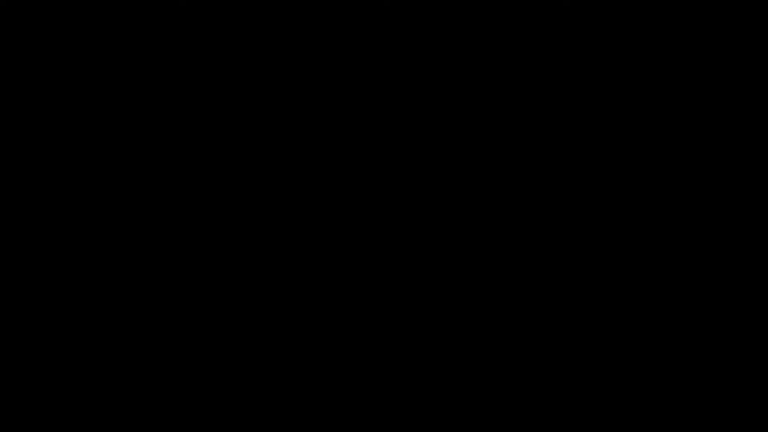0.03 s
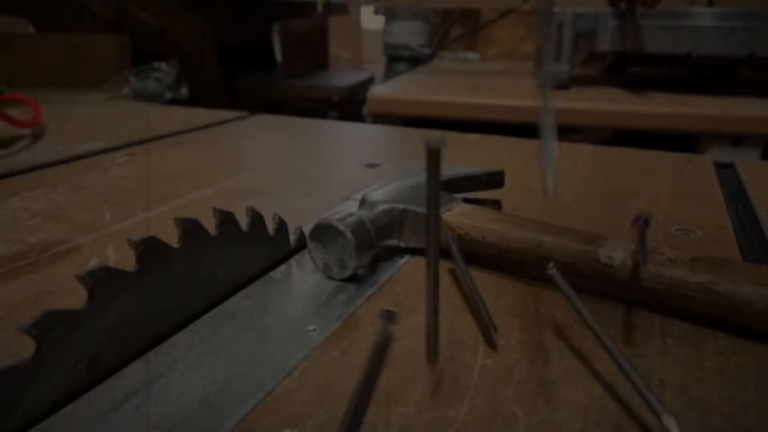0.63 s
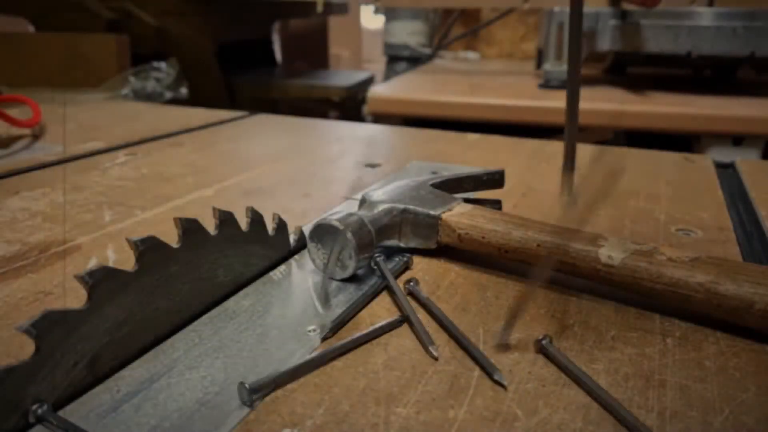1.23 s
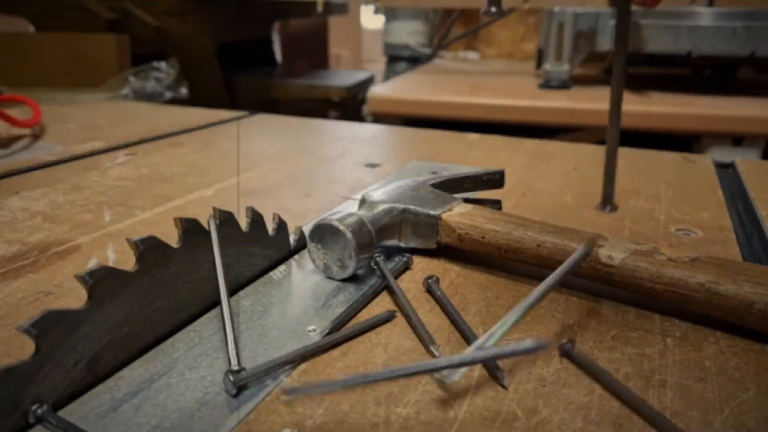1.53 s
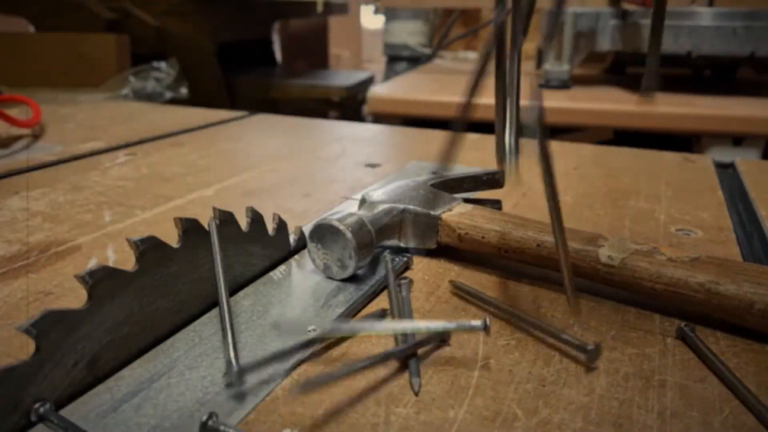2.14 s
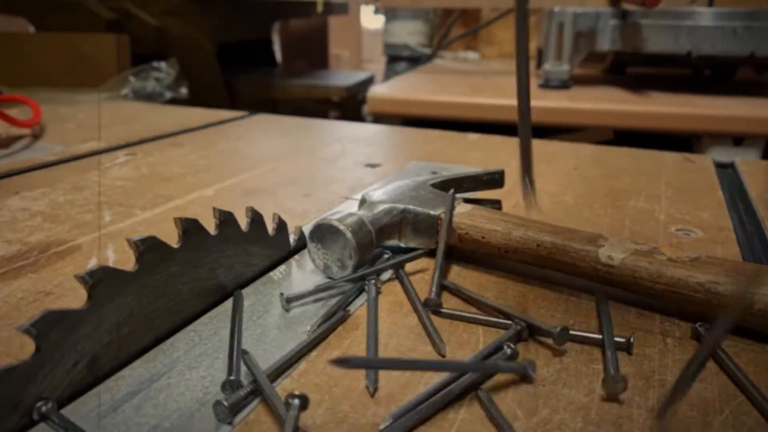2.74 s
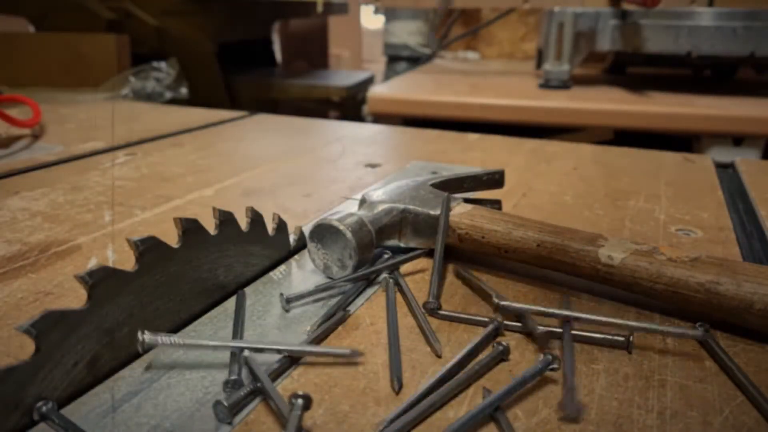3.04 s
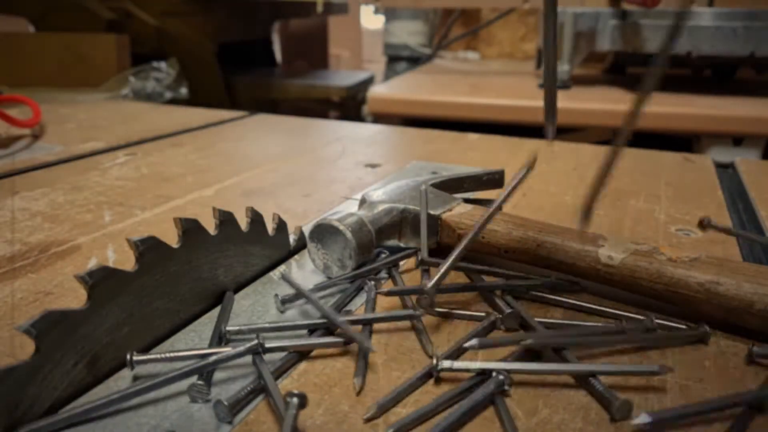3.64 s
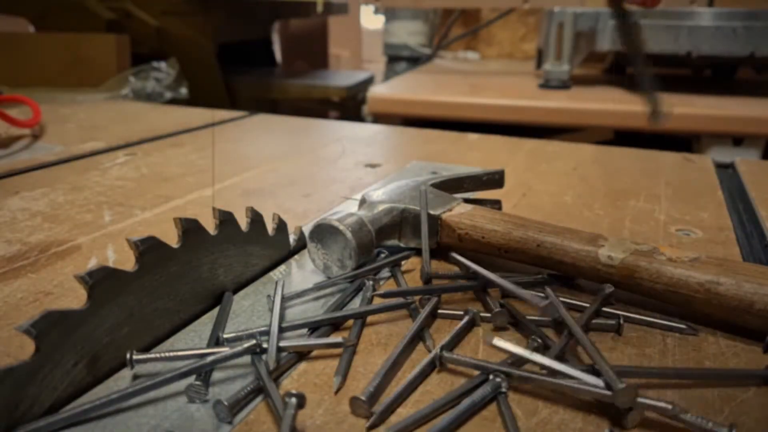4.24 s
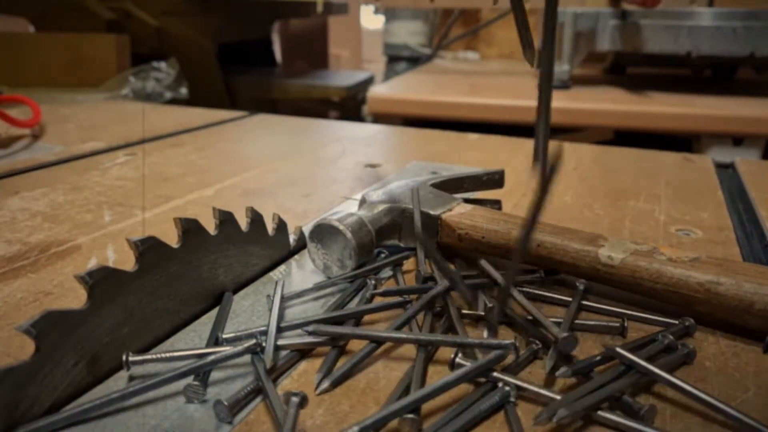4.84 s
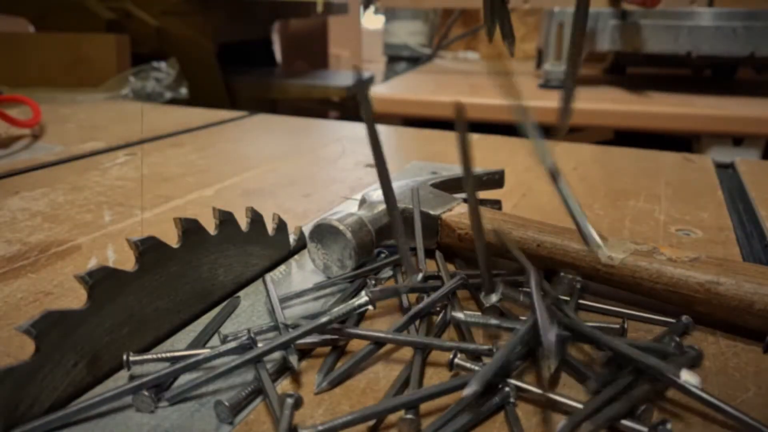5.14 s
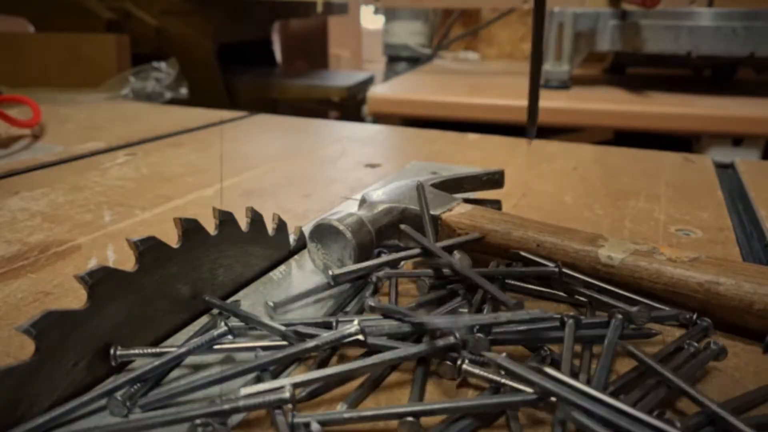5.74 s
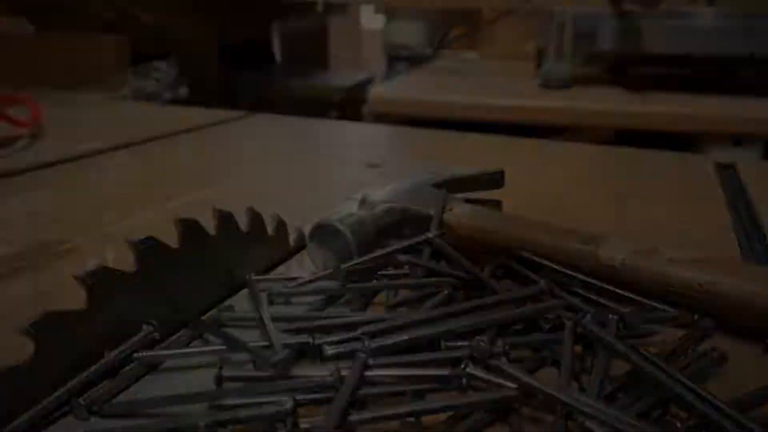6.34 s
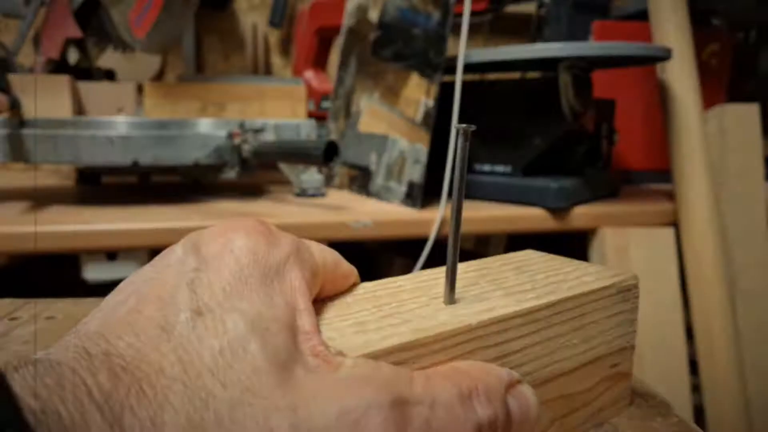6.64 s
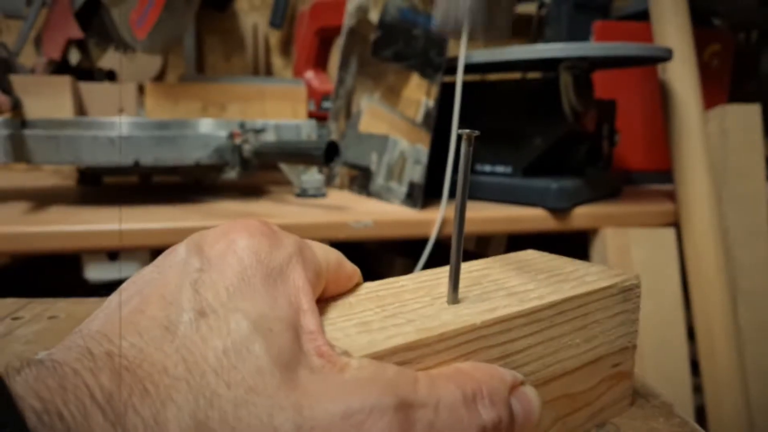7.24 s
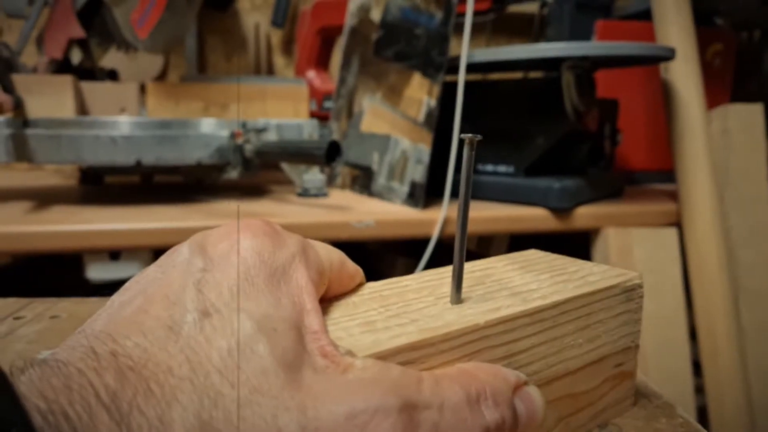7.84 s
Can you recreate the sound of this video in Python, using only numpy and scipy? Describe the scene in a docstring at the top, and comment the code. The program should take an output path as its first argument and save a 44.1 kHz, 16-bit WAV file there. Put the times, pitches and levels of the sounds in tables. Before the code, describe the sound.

Handfuls of steel nails drop onto a wooden workbench, knocking on the wood, ticking against each other and ringing with a high, thin tone as they bounce and skitter. A few ping off a saw blade. After about six seconds the clatter fades out, and a hammer drives a nail into a wooden block with six quick, even blows, each a crack and a thud. The stereo microphones are close, in a small workshop.

```python
"""Handfuls of steel nails rain on a wooden workbench, a saw blade and each other. Each impact gives a
knock and a tick and excites the nail's bending modes, the strongest near 9.6 kHz; the nails then hop
and skitter. The clatter fades out, and a hammer drives a nail into a wooden block with six even blows,
each a crack and a thud that set the block's modes ringing. A close pair of microphones stands on the
bench, picking up bumps through its stand and the reverberation of a small workshop."""
import sys
import numpy as np
from scipy import signal
from scipy.fft import rfft, irfft
from scipy.io import wavfile

SR = 44100
rng = np.random.default_rng(int(sys.argv[2]) if len(sys.argv) > 2 else 0)


def unload_wav(signal):
    """Save mono or channel-first audio to the path in sys.argv[1] as 16-bit WAV at rate SR, clipped to [-1, 1]."""
    wavfile.write(
        sys.argv[1],
        SR,
        np.round(np.clip(np.atleast_2d(signal).T, -1, 1) * 32767).astype(np.int16),
    )


N = 347508
TIME = np.arange(N) / SR

# Levels within a table are relative; the function that plays it may add an overall gain.
# hardest landings of the nails: start_s, knock_db, tick_db, pitch_hz, ring_db
LANDINGS = [(0.1837, -28, -31.5, 9320, -40), (0.1932, -35, -29.5, 9500, -43.5),
            (0.3229, -21, -29, 9630, -27.5), (0.3681, -20, -31, 9400, -35.5), (0.3792, -33, -25, 9870, -30),
            (0.3889, -36, -25.5, 9860, -38), (0.4335, -25, -19.5, 9730, -28),
            (0.4383, -18, -16.5, 9760, -25.5), (0.475, -20, -30.5, 9650, -21),
            (0.501, -20, -37.5, 9440, -28), (0.5462, -34.5, -30, 9730, -32),
            (0.5988, -19, -20.5, 9760, -26.5), (0.6199, -35.5, -21.5, 9430, -23.5),
            (0.6389, -21, -33, 9500, -17), (0.6981, -23.5, -26, 9490, -28), (0.7189, -23, -19, 9560, -25.5),
            (0.7299, -24.5, -21.5, 9490, -27), (0.7686, -24.5, -16, 9630, -17),
            (0.8808, -30.5, -18.5, 9900, -34), (0.9038, -46, -22.5, 9400, -32.5),
            (0.937, -32.5, -23.5, 9790, -29), (1.095, -36, -26, 9550, -40.5),
            (1.2004, -19.5, -32, 9480, -20.5), (1.2646, -19, -22, 9700, -45.5),
            (1.2767, -38, -22.5, 9540, -33), (1.2932, -20.5, -23, 9670, -28),
            (1.3127, -47, -33, 9660, -25.5), (1.3601, -44, -18.5, 9500, -30),
            (1.4073, -23.5, -21.5, 9800, -38), (1.4448, -17, -25, 9670, -47.5),
            (1.4926, -28, -21, 9830, -42.5), (1.5089, -25, -32, 9680, -44.5),
            (1.5466, -22, -21.5, 9650, -39.5), (1.6264, -26.5, -26, 10000, -37),
            (1.6395, -19.5, -20.5, 9570, -37), (1.714, -34.5, -26.5, 9980, -30.5),
            (1.755, -30.5, -26, 9910, -38), (1.776, -26.5, -26, 9430, -39), (1.81, -24.5, -28, 9460, -26.5),
            (1.8313, -26, -15.5, 9480, -24.5), (1.92, -25.5, -21.5, 9900, -21),
            (2.0393, -29, -24.5, 9460, -41), (2.0879, -31.5, -25, 9470, -27.5),
            (2.1426, -27, -25, 9750, -19.5), (2.1524, -22.5, -22, 9750, -25), (2.1714, -22, -34, 9790, -32),
            (2.1814, -19.5, -32.5, 9700, -34), (2.2016, -22.5, -31, 9590, -30),
            (2.244, -27.5, -22.5, 9700, -25), (2.3389, -40, -21, 9740, -32.5),
            (2.4368, -25.5, -43.5, 9800, -32), (2.4514, -32, -21, 9800, -39), (2.5118, -25, -24, 9620, -29),
            (2.5579, -29, -16.5, 9500, -20.5), (2.6008, -23.5, -16.5, 9190, -21),
            (2.642, -29, -22.5, 9400, -41), (2.7582, -23.5, -36, 9700, -45),
            (2.8009, -19, -23.5, 10100, -40), (2.91, -25.5, -21, 9680, -31),
            (2.9656, -38, -19.5, 9700, -38), (3.0305, -39.5, -25, 9490, -28),
            (3.1581, -21, -22.5, 9880, -27.5), (3.229, -35, -19.5, 9300, -35),
            (3.2736, -35, -24, 9600, -38), (3.2917, -29, -24.5, 9680, -33.5),
            (3.3005, -27.5, -23, 9680, -36), (3.3616, -32, -17, 9500, -22), (3.3751, -21, -22, 9640, -25),
            (3.42, -22.5, -32, 9740, -26), (3.5852, -28.5, -22.5, 9800, -28), (3.7024, -22, -26, 9500, -39),
            (3.8911, -24, -31, 9500, -28), (3.998, -23.5, -23, 9620, -22), (4.01, -31, -20.5, 9800, -30),
            (4.021, -27.5, -36, 9310, -35), (4.1221, -22.5, -28.5, 9850, -36), (4.234, -29, -26, 9710, -39),
            (4.334, -25.5, -19.5, 9700, -24.5), (4.5035, -29.5, -24, 9860, -31),
            (4.5331, -28.5, -33, 9710, -25), (4.5418, -21, -34, 9600, -28), (4.5525, -24, -28, 9700, -27),
            (4.5633, -35, -18.5, 9670, -28), (4.6087, -25, -28, 9700, -27), (4.642, -31, -21.5, 9520, -33),
            (4.681, -30, -23, 10020, -28), (4.7553, -24.5, -23, 9640, -37.5),
            (4.863, -19.5, -27, 9360, -29.5), (4.8836, -27, -40, 9400, -39),
            (4.9243, -26.5, -21, 9440, -33), (4.9476, -34, -28, 9350, -26.5), (5.0914, -31, -34, 9510, -27),
            (5.1315, -16, -21, 9500, -34), (5.2858, -32, -23.5, 9460, -22), (5.3666, -32, -25, 9710, -31),
            (5.4423, -28.5, -26.5, 9850, -31), (5.4987, -27, -23, 9740, -23.5),
            (5.5113, -21.5, -30, 9740, -30.5), (5.5306, -27, -21, 9950, -26),
            (5.5543, -25.5, -24.5, 9700, -29), (5.5958, -23, -20, 9600, -31),
            (5.6421, -32, -28.5, 9420, -28), (5.695, -37, -25, 9550, -28.5),
            (5.8397, -32.5, -29.5, 9640, -34), (6.0071, -21, -20.5, 9600, -28),
            (6.0815, -25.5, -27, 9910, -32), (6.1094, -25, -21, 9040, -22.5), (6.133, -23, -24, 9780, -29),
            (6.146, -42, -20, 9560, -37), (6.229, -32, -25, 9670, -30.5), (6.2473, -26, -20.5, 9260, -32),
            (6.2619, -50, -20.5, 9300, -40), (6.3408, -32.5, -23.5, 9040, -41)]
# nails let go by the handful: start_s, length_s, rebound_rattle_db, rebound_ring_db
HANDFULS = [(0.353, 0.52, -33, -30.5), (0.856, 0.13, -35, -41), (1.277, 0.3, -44.5, -43),
            (1.638, 0.33, -37.5, -35), (2.137, 0.2, -31.5, -33), (2.493, 0.11, -31.5, -31),
            (2.963, 0.038, -29, -31.5), (3.225, 0.3, -32, -34.5), (3.543, 0.22, -36, -38),
            (4.008, 0.17, -35.5, -35.5), (4.346, 0.04, -36, -39.5), (4.512, 0.14, -32.5, -32.5),
            (4.924, 0.053, -31, -35), (5.089, 0.32, -32.5, -31), (5.443, 0.26, -32.5, -33.5),
            (5.794, 0.017, -38, -45), (6.06, 0.23, -34, -41)]
# single clear pings of nails and tools: start_s, pitch_hz, level_db, t60_s
PINGS = [(.1935, 3390, -40, 0.77), (1.0, 9910, -27.5, 0.27), (1.547, 3600, -41, .45),
         (1.6392, 10210, -31.5, 0.54), (3.485, 12150, -37, .4), (3.685, 4400, -35, 0.087),
         (4.642, 4360, -28, .09), (5.842, 4380, -38, 0.064)]
# fade of the clatter: time_s, gain_db
CLATTER_FADE = [(6.3, 2.5), (6.38, 0), (6.45, -9.5), (6.475, -55)]
# hammer blows: start_s, thud_db, crack_db, tail_db
BLOWS = [(6.668, -15, -40, -24), (6.9267, -14, -21.5, -23), (7.1733, -14, -18.5, -23),
         (7.4126, -14.5, -15.5, -25.5), (7.6448, -15.5, -17, -24), (7.8742, -19, -16.5, -17)]

# lesser impacts: start_s, level_db
SAW_HITS = [(1.31, -35.5), (2.965, -28.5), (3.229, -40.5), (3.486, -40), (6.247, -41)]   # nails striking the saw blade
BLOCK_SETTLES = [(7.2915, -37), (7.7262, -38)]   # the block settling back
STAND_JOLTS = [(.484, -32), (.868, -36), (1.93, -40), (2.203, -36), (2.31, -36), (2.58, -40), (3.35, -32),
               (3.736, -35), (4.534, -31.5), (5.313, -30), (5.59, -21.5), (6.668, -12.5), (6.927, -38),
               (7.174, -37), (7.413, -14)]   # jolts that shake the microphone stand

# normal modes: pitch_hz, level_db, t60_s
SAW_MODES = [(1820, -15, .6), (3407, -15, .6), (3583, -11, .7), (4557, -6, .75), (5818, -11, .5),
             (7089, -5, .3), (7112, -5, .9), (8049, 0, .6), (8893, -10, .35), (12880, -9, .3),
             (14127, -2, .25), (14326, 4, .3), (14375, -1, .25)]
BENCH_MODES = [(155.2, -9.5, 0.24), (339, -4.5, 0.2), (424, -7.5, 0.065), (547, -1, 0.14), (686, -17, .08),
               (870, -2.5, 0.059), (1650, 4, 0.054), (2660, 5.5, 0.033)]
BLOCK_MODES = [(240.8, -7, 0.33), (275.8, -11, 0.33), (312, -4, 0.11), (350, -8, 0.29), (483, -5, .05),
               (595, 3, 0.11), (675, 1.5, 0.097), (864, -35, .2), (1090, -8.5, 0.23), (1500, 3, 0.049),
               (2400, -26, 0.18)]   # block and bench under the hammer
STEEL_MODES = [(2570, -26, 0.53), (4480, -30, 0.37), (9700, -24, 0.33)]   # hammer head and nail

# spectra: frequency_hz, density_db
AIR_SPECTRUM = [(30, 6), (150, -8.5), (280, -3.5), (500, -16), (1500, -27), (3000, -21), (6000, -34),
                (15000, -40)]   # quiet of the shop
KNOCK_SPECTRUM = [(60, -19), (150, -20), (300, -3.5), (600, -0.5), (1300, -1.5), (2000, -5), (2700, 1),
                  (4000, -8), (8000, -13.5), (16000, -50.5)]   # nail on wood
TICK_SPECTRUM = [(300, -12.5), (2000, -11.5), (4000, -3), (7000, 2.5), (9500, 3), (11000, -0.5),
                 (14000, -3.5), (16000, -2.5)]   # steel on steel
RATTLE_SPECTRUM = [(60, -18), (150, -5), (350, 2.5), (700, 4), (1400, 3.5), (2000, 2.5), (3000, 3),
                   (5000, -1), (8500, 1), (11000, 3.5), (15500, -4.5)]   # small rebounds
THUD_SPECTRUM = [(50, -30), (150, -4), (280, -9), (600, -1), (1000, -5), (1500, -3.5), (2000, -12.5),
                 (2700, -6), (4000, -17), (8000, -36), (16000, -60)]   # the hammered block
BOOM_SPECTRUM = [(50, -18), (120, -3.5), (190, -6.5), (280, 5.5), (420, -5), (620, -0.5), (900, -13.5),
                 (1400, -8.5), (2000, -13.5), (2800, -14), (5000, -24.5), (9500, -22.5), (15500, -31)]   # bench and shop after a blow
JINGLE_SPECTRUM = [(3000, -17), (8000, -7), (11000, -8), (13500, -0.5), (16000, -11)]
SHIMMER_SPECTRUM = [(1500, -30), (3300, -1), (5000, -8), (8000, 5), (11000, -5), (14500, 0)]

# decay times of dense echoes: frequency_hz, t60_s
SHOP_DECAY = [(100, 0.7), (300, 0.24), (800, 0.17), (2000, 0.31), (5000, 0.39), (14000, 0.2)]
BOOM_DECAY = [(100, 0.21), (300, 0.14), (800, 0.21), (2000, 0.21), (5000, 0.24), (14000, 0.24)]
EARLY_DECAY = [(200, 0.057), (2000, 0.058), (12000, 0.035)]

NAIL_HZ = 9620   # usual pitch of a nail's second bending mode
LOW_MODE_RATIO = 2.756   # a bar's second bending mode over its first
LOW_MODE_DB, LOW_MODE_T60_S = -19, .2   # the first mode is weak and soon damped by the bench
HOP_S, RESTITUTION, HOP_LOSS_DB = .028, .7, 13
ARRIVE_S, REST_T60_S, REBOUNDS_PER_S = 0.019, 0.88, 150   # skittering of a handful
BENCH_DB, STAND_DB = -17, -28.5   # coupling of a knock to the bench top and the microphone stand
CUTOFF_HZ = 15900


def from_db(db):
    """Amplitude ratio: a factor of ten for every 20 dB."""
    return 10 ** (np.asarray(db) / 20)


def unit(x):
    """Normalisation to a mean energy of 1 per channel."""
    return x / np.sqrt(np.mean(np.sum(x ** 2, axis=-1)) + 1e-20)


def at_hz(points, hz):
    """Interpolation of a table on a log-frequency axis."""
    f, value = np.transpose(points)
    return np.interp(np.log(np.maximum(hz, 1)), np.log(f), value)


def add(out, start_s, sound):
    """Superposition: a sound adds linearly to the mix from its start time."""
    i = int(np.clip(round(start_s * SR), 0, N - 1))
    out[..., i:i + sound.shape[-1]] += sound[..., :N - i]


def impulses(times, levels_db):
    """Impulsive excitation: each contact lasts one sample."""
    out = np.zeros(N)
    np.add.at(out, np.clip(np.round(np.array(times) * SR).astype(int), 0, N - 1), from_db(levels_db))
    return out


def convolve(x, response):
    """Convolution: the output of a linear system with this impulse response."""
    return signal.oaconvolve(np.atleast_2d(x), np.atleast_2d(response), axes=-1)[:, :N]


def colour(spectrum, size=2048):
    """Minimum phase: folding the cepstrum gives a causal response with this spectral shape."""
    cepstrum = irfft(np.log(from_db(at_hz(spectrum, np.arange(size // 2 + 1) * SR / size))))
    cepstrum[1:size // 2] *= 2
    cepstrum[size // 2 + 1:] = 0
    return unit(irfft(np.exp(rfft(cepstrum))))


def resonator(strikes, hz, t60):
    """Damped harmonic oscillator: a unit impulse starts a decaying sine of height 1."""
    r, w = from_db(-60 / (t60 * SR)), 2 * np.pi * hz / SR
    return signal.lfilter([0, np.sin(w)], [1, -2 * r * np.cos(w), r * r], strikes + 1e-18)


def decay(t, t60, bend=1):
    """Exponential decay, 60 dB down at t60; a bend above 1 holds at first and then falls faster."""
    return np.exp(-np.log(1000) * (t / t60) ** bend)


def pair(noise, coherence):
    """Partial coherence: two independent noises form the sum and difference of left and right."""
    coherence = np.clip(coherence, -.99, .99)
    return np.sqrt(1 + coherence) * noise[0] + np.sqrt(1 - coherence) * noise[1] * np.array([[1], [-1]])


def placed(x, lag_s, pan_db):
    """Path difference: the right channel arrives later; a positive pan favours the left."""
    right = np.interp(TIME - lag_s, TIME, x[-1])
    return np.array([x[0], right]) * from_db([[pan_db / 2], [-pan_db / 2]])


def contacts(times, levels_db, spectrum, t60, coherence, snap, pan_spread_db, size=1024):
    """Brief impacts are broadband: each is a sharp edge and a burst of scatter, shaped by a spectrum."""
    out, t = np.zeros((2, N)), np.arange(size) / SR
    response = rfft(colour(spectrum), 2 * size)
    for s, db in zip(times, levels_db):
        grain = unit(pair(rng.standard_normal((2, size)), coherence) * decay(t, t60))
        grain[:, 0] -= snap
        pan = from_db(pan_spread_db * rng.normal() * np.array([[1], [-1]]))
        grain = irfft(rfft(grain, 2 * size) * response) * pan
        add(out, s, unit(grain) * from_db(db) * np.sqrt(.004 * SR))   # energy of 4 ms at this rms level
    return out


def diffuse(t60s, coherent_below_hz, build_s, bend=1, size=20480):
    """Diffuse field: dense echoes decay band by band, coherent between microphones only in the lows."""
    t, hz = np.arange(size) / SR, np.arange(size // 2 + 1) * SR / size
    noise, out = rfft(rng.standard_normal((2, size))), 0
    edges = np.r_[0, np.geomspace(100, SR / 2, 14)]
    for low, high in zip(edges, edges[1:]):
        centre = (low + high) / 2
        coherence = 1.64 / (1 + (centre / coherent_below_hz) ** 2)
        band = pair(irfft(noise * ((hz >= low) & (hz < high))), coherence)
        out = out + band * decay(t, at_hz(t60s, centre), bend)
    return unit(out * (1 - np.exp(-t / build_s)))


def struck_body(times, levels_db, modes, vary_db):
    """Modal superposition: each blow lands elsewhere and so feeds each mode with its own strength."""
    spot_db = vary_db * rng.standard_normal((len(times), len(modes)))
    return sum((-1) ** k * resonator(impulses(times, np.array(levels_db) + db + spot_db[:, k]), hz, t60)
               for k, (hz, db, t60) in enumerate(modes))


def shop_air():
    """Ambient noise: a faint, mostly low hush that rises just before the hammering."""
    hush = convolve(pair(rng.standard_normal((2, N)), coherence=0.59), colour(AIR_SPECTRUM))
    return hush * from_db(np.interp(TIME, [.1, .3, 6.45, 6.65], [-89, -69.5, -71.5, -61.5]))


def stand_bumps():
    """Structure-borne sound: jolts, and faintly the landings, shake the stand, most on the left."""
    shakes = STAND_JOLTS + [(s, knock_db + STAND_DB) for s, knock_db, *_ in LANDINGS]
    bump = struck_body(*np.transpose(shakes), modes=[(34, -1.0, 0.18), (67, 5.0, 0.054)], vary_db=1.0)
    return np.array([bump, np.roll(bump, 200)]) * from_db([[0], [-17]])


def early_echoes(x, spots=5):
    """Early reflections from tools and bench top depend on position, so they change with each landing."""
    spot = np.searchsorted(np.sort(np.transpose(LANDINGS)[0]), TIME + 2 / SR) % spots
    responses = [diffuse(EARLY_DECAY, coherent_below_hz=1200, build_s=0.002, size=4096)
                 for _ in range(spots)]
    return sum(convolve(x * (spot == k), response) for k, response in enumerate(responses))


def swell(times, levels_db, rise_t60, size=4000):
    """Exponential growth: a short, dull swell of noise leads into each blow."""
    out, t = np.zeros((2, N)), np.arange(size) / SR
    for s, db in zip(times, levels_db):
        noise = pair(rng.standard_normal((2, size)), coherence=0.084)
        add(out, s - size / SR, from_db(db) * noise * decay(t[::-1], rise_t60))
    return convolve(out, colour(THUD_SPECTRUM))


def jingle(times, level_db, first_s, last_s, count=6):
    """Secondary impacts: loose bits of metal hop on the bench after each blow."""
    starts = (np.array(times)[:, None] + rng.uniform(first_s, last_s, (len(times), count))).ravel()
    levels = level_db + 1.6 * rng.standard_normal(len(starts))
    return contacts(starts, levels, JINGLE_SPECTRUM, t60=0.01, coherence=0.24, snap=.3, pan_spread_db=4)


def boom(times, levels_db):
    """Reverberation: bench and shop rumble after each blow, never twice alike."""
    out = np.zeros((2, N))
    for s, db in zip(times, levels_db):
        echoes = diffuse(BOOM_DECAY, coherent_below_hz=270, build_s=0.0016, bend=1.86)
        add(out, s, from_db(db) * unit(convolve(echoes, colour(BOOM_SPECTRUM))))
    return out


def hammer():
    """Impact and free vibration: steel cracks on the nail head, the block thuds, and both ring on."""
    s, thud_db, crack_db, tail_db = np.transpose(BLOWS)
    thud = contacts(s, thud_db, THUD_SPECTRUM, t60=0.026, coherence=0.88, snap=0.54, pan_spread_db=1)
    crack = contacts(s, crack_db, TICK_SPECTRUM, t60=0.012, coherence=0.13, snap=0.098, pan_spread_db=9)
    ringing = struck_body(s, tail_db + 0.5, BLOCK_MODES + STEEL_MODES, vary_db=4.0)
    # the block is shoved into the bench and springs back for a few cycles
    shove = -resonator(impulses(s + .002, thud_db + 2), hz=280, t60=.035)
    tail = boom(s, tail_db + 34.0)
    settle = contacts(*np.transpose(BLOCK_SETTLES), THUD_SPECTRUM,
                      t60=.04, coherence=0.64, snap=0.26, pan_spread_db=3)
    loose = jingle(s, level_db=-39.5, first_s=0.029, last_s=.11)
    lead_in = swell(s, thud_db - 10, rise_t60=.052)
    direct = placed(thud + crack + ringing + shove, lag_s=.00006, pan_db=1.3)
    return direct + tail + settle + loose + lead_in


def saw_blade():
    """Plate vibration: a few strong modes stand over a shimmer of many weak ones."""
    s, db = np.transpose(SAW_HITS)
    modes = placed(struck_body(s, db + 3, SAW_MODES, vary_db=1)[None], lag_s=.0003, pan_db=3)
    dense_modes = diffuse([(3000, 0.6), (15000, .42)], coherent_below_hz=670, build_s=0.0023)
    shimmer = unit(convolve(dense_modes, colour(SHIMMER_SPECTRUM)))
    return modes + convolve(impulses(s, db + 37.5), shimmer) * from_db([[2], [-2]])


def rebound_levels(t):
    """Dissipation: each handful's motion rises, holds and dies away; gives rattle and ring in dB."""
    s, length, rattle_db, ring_db = np.transpose(HANDFULS)[:, :, None]
    motion = np.clip((t - s) / ARRIVE_S, 0, 1) * decay(np.maximum(t - s - length, 0), REST_T60_S)
    return [20 * np.log10(np.max(motion * from_db(db), axis=0) + 1e-9) for db in (rattle_db, ring_db)]


def skitter(spread_db, ring_t60, scatter_hz, size=7000):
    """Poisson process: small rebounds come at random; each clicks and sets a loose nail ringing."""
    active = (TIME > HANDFULS[0][0]) & (TIME < CLATTER_FADE[-1][0])
    starts = TIME[(rng.random(N) < REBOUNDS_PER_S / SR) & active]
    strength, detune, phase = rng.standard_normal((len(starts), 3)).T
    rattle_db, ring_db = rebound_levels(starts) + spread_db * np.clip(strength, -2, 2)
    out = contacts(starts, rattle_db, RATTLE_SPECTRUM,
                   t60=0.015, coherence=0.52, snap=0.56, pan_spread_db=2.5, size=512)
    t = np.arange(size) / SR
    fading = decay(t, ring_t60)
    for s, db, hz, right_phase in zip(starts, ring_db, NAIL_HZ + scatter_hz * detune, np.pi * phase):
        add(out, s, from_db(db) * fading * np.sin(2 * np.pi * hz * t + [[0], [right_phase]]))
    return out


def hops(count=3):
    """Inelastic rebound: a nail's hops tend to shorten and weaken; gives start_s, knock_db, tick_db."""
    s, knock_db, tick_db, _, _ = np.transpose(LANDINGS)[:, :, None]
    luck, k = rng.standard_normal((len(s), 3, count)), np.arange(count)
    flight_s = HOP_S * RESTITUTION ** k * np.exp(.4 * luck[:, 0])
    starts = s + np.cumsum(flight_s, axis=1)
    loss_db = HOP_LOSS_DB * (k + 1)
    knock_db = knock_db - loss_db + 2.5 * luck[:, 1]
    tick_db = tick_db - loss_db + 3 * luck[:, 2]
    return starts.ravel(), knock_db.ravel(), tick_db.ravel()


def nail_rings(t60, split_hz, twin_db, spin_hz, spin_depth, size=11000):
    """Beating: a nail bends in two planes at nearly one pitch, and its ring throbs as it tumbles."""
    out, t = np.zeros((2, N)), np.arange(size) / SR
    w = 2 * np.pi * t
    second_modes = [(s, hz, db, t60) for s, _, _, hz, db in LANDINGS]
    first_modes = [(s, hz / LOW_MODE_RATIO, db + LOW_MODE_DB, LOW_MODE_T60_S)
                   for s, hz, db, _ in second_modes]
    for s, hz, db, mode_t60 in second_modes + PINGS + first_modes:
        split, spin, life = rng.standard_normal(3)
        phase = 2 * np.pi * rng.random((3, 2, 1))
        tone = np.sin(w * hz + phase[0])
        twin = from_db(twin_db) * np.sin(w * (hz + split_hz * split) + phase[1])
        tumble = 1 + spin_depth * np.sin(w * spin_hz * np.exp(spin / 2) + phase[2])
        add(out, s, from_db(db) * (tone + twin) * tumble * decay(t, mode_t60 * np.exp(life / 4)))
    return out


def falling_nails():
    """Direct and reflected sound: nails strike wood, steel and the saw blade, and the shop echoes."""
    s, knock_db, tick_db = np.hstack([np.transpose(LANDINGS)[:3], hops()])
    knocks = contacts(s, knock_db, KNOCK_SPECTRUM, t60=0.014, coherence=0.42, snap=0.53, pan_spread_db=3)
    ticks = contacts(s, tick_db, TICK_SPECTRUM, t60=0.0097, coherence=0.2, snap=0.57, pan_spread_db=6.5)
    bench = struck_body(s, knock_db + BENCH_DB, BENCH_MODES, vary_db=2.5)
    rings = nail_rings(t60=0.34, split_hz=84, twin_db=-12.0, spin_hz=25, spin_depth=0.28)
    rebounds = skitter(spread_db=4.0, ring_t60=0.21, scatter_hz=169.6)
    impacts = placed(knocks + bench + rebounds, lag_s=0.000215, pan_db=-0.1)
    impacts += placed(ticks, lag_s=0.000217, pan_db=-1.0)
    # light nails hardly move the heavy bench at low frequencies
    impacts = signal.sosfilt(signal.butter(2, 70, "high", fs=SR, output="sos"), impacts)
    early = early_echoes(impacts)
    walls = convolve(impacts + rings, diffuse(SHOP_DECAY, coherent_below_hz=780, build_s=0.0012))
    direct = impacts + rings * from_db([[.7], [-.7]]) + saw_blade()
    fade = from_db(np.interp(TIME, *np.transpose(CLATTER_FADE)))
    return (direct + from_db(-8.5) * early + from_db(-7.0) * walls) * fade


def scene():
    """Superposition: over the faint air of the shop come the nails, then the hammer."""
    return shop_air() + falling_nails() + hammer() + stand_bumps()


def record(dry):
    """Soft saturation rounds the highest peaks, and a low-pass filter limits the bandwidth."""
    rounded = dry / (1 + (np.abs(dry) / .95) ** 4) ** .25
    return signal.sosfilt(signal.ellip(10, .1, 80, CUTOFF_HZ, fs=SR, output="sos"), rounded)


dry = scene()
out = record(dry)
unload_wav(out)
```